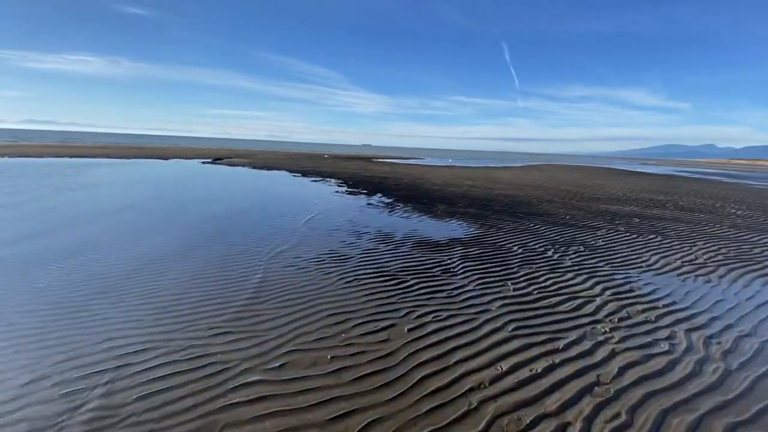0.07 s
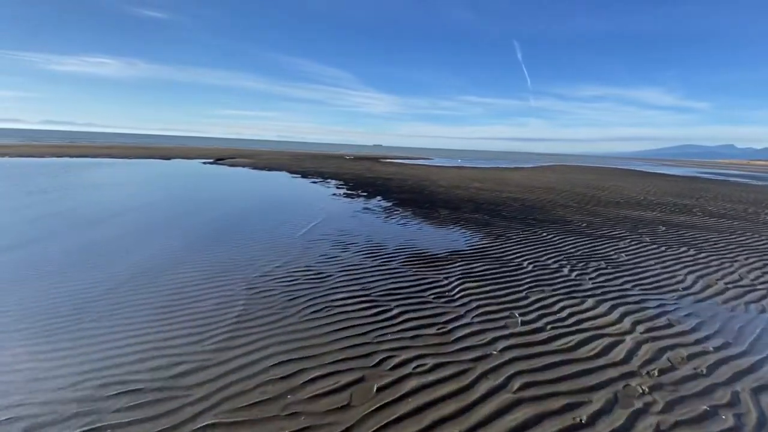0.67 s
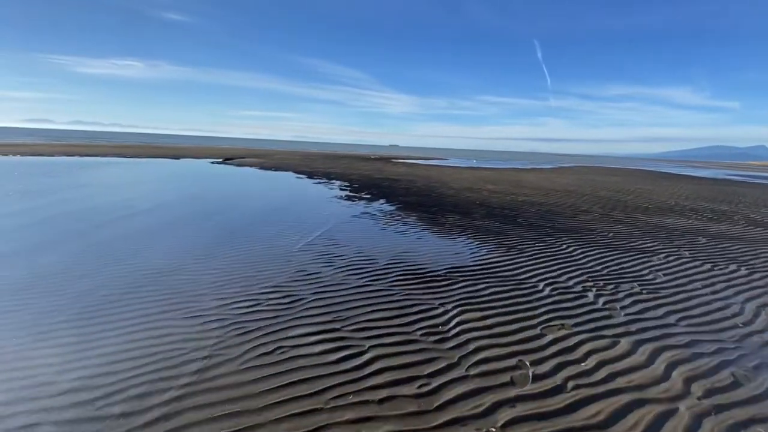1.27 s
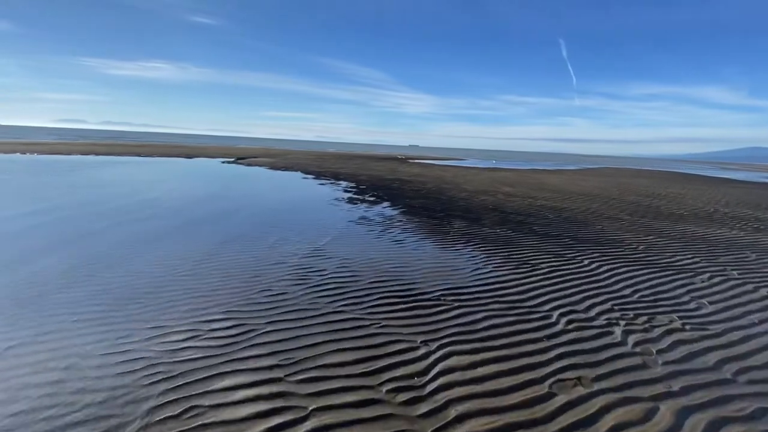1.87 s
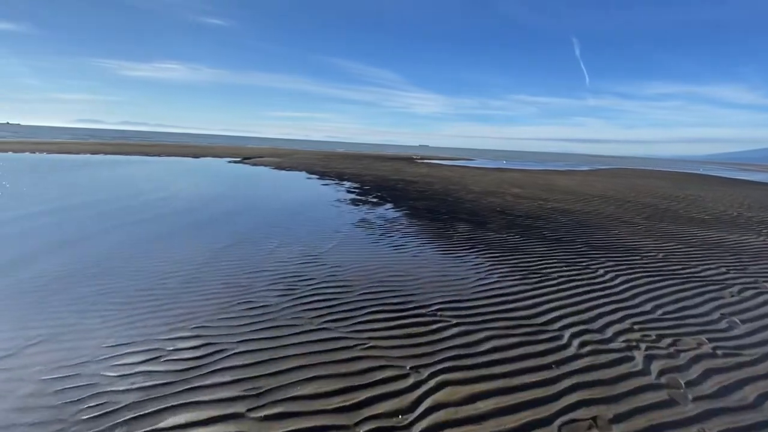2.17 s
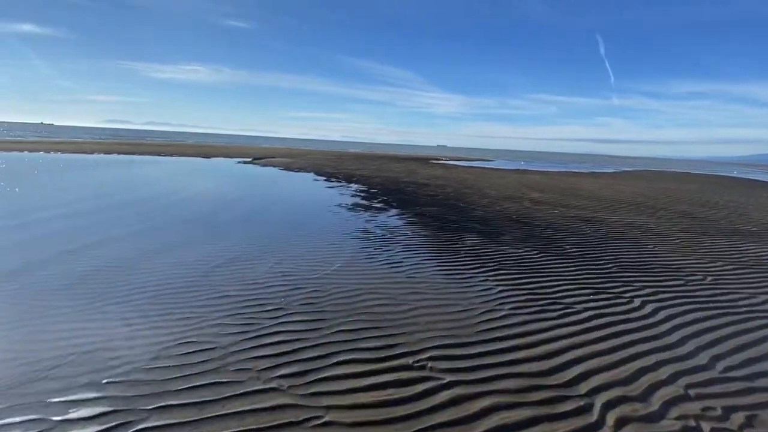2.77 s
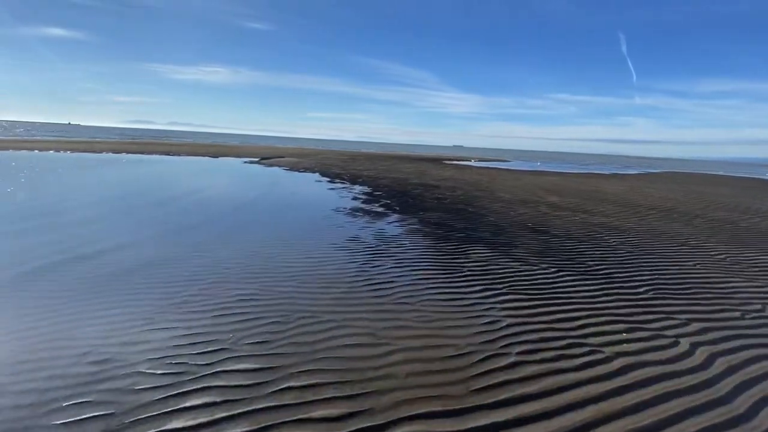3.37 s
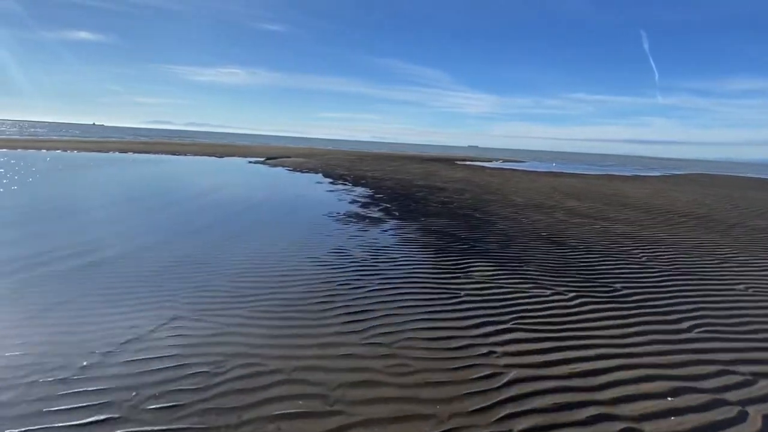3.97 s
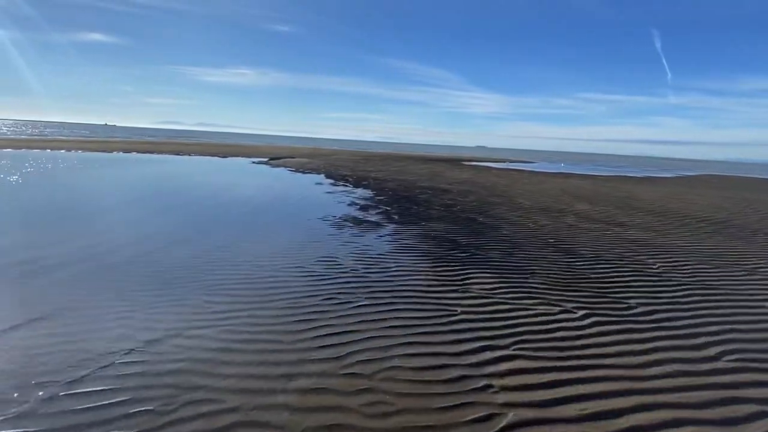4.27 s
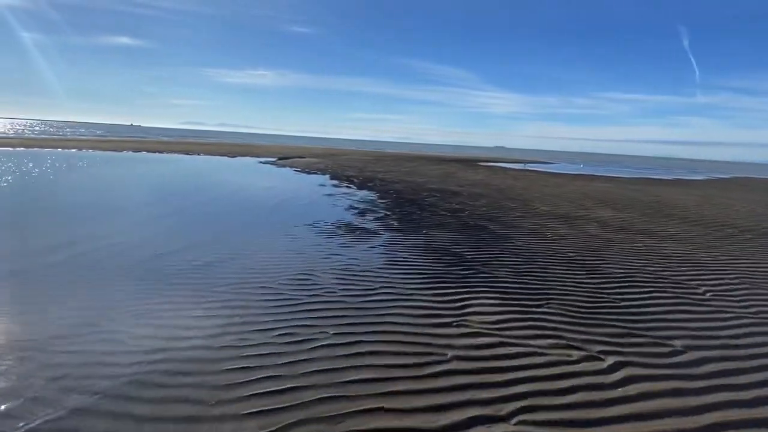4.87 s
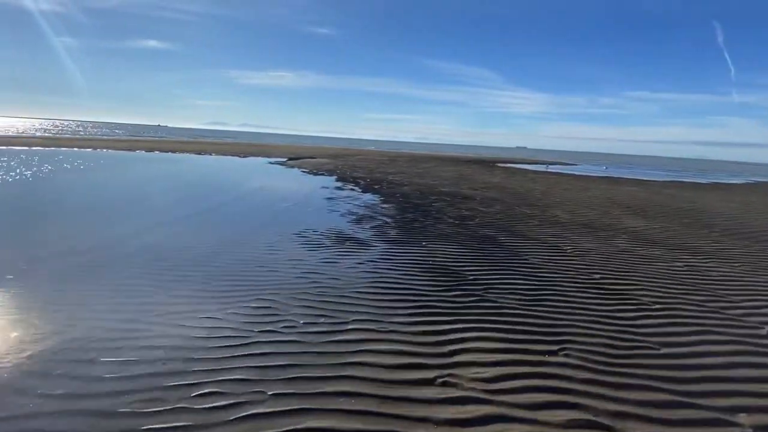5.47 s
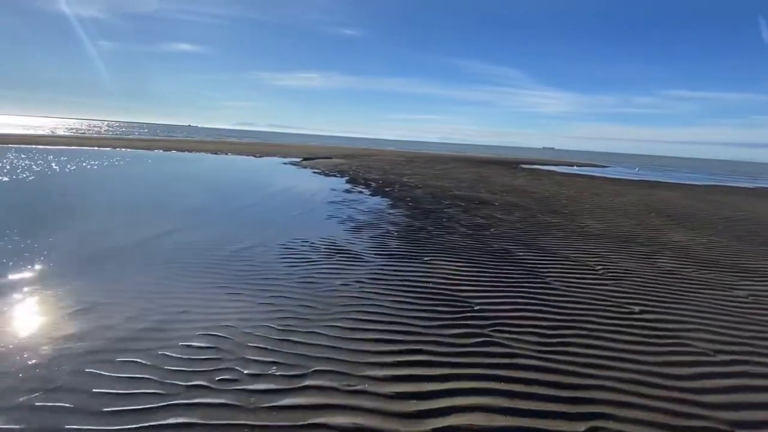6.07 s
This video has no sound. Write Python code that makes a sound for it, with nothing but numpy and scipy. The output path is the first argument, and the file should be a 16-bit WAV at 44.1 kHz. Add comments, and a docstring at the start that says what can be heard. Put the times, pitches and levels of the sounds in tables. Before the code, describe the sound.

Someone walks at an even pace over wet sand on an open beach. Each close step crunches and squelches, with a fizz of droplets and occasional sharp watery clicks and tiny bubbles, mostly early on. Clothing swishes with every stride. Wind picks up from a lull and buffets the handheld microphone in low gusts, while distant surf makes a soft, steady wash without any echo.

```python
"""Beside a tide pool, on wet, rippled sand: someone walks at an even pace, phone microphone in hand.
Close below, each sole crushes the sand, water sprays, clicks and bubbles under it, and clothing
swishes with every stride. Wind buffets the microphone itself, while far off the surf merges into
a steady wash. Open air, with no walls to echo."""
import sys
import numpy as np
from scipy import signal
from scipy.fft import rfft, irfft
from scipy.io import wavfile

SR = 44100
rng = np.random.default_rng(int(sys.argv[2]) if len(sys.argv) > 2 else 0)


def dump_mix(stems):
    """Bounce the given channels to the path in sys.argv[1] as a 16-bit WAV at rate SR."""
    frames = np.atleast_2d(stems).T  # one column per channel
    limited = np.clip(frames, -1, 1)  # hard clip at full scale
    pcm = np.round(limited * 32767).astype(np.int16)
    wavfile.write(sys.argv[1], SR, pcm)


N = 269892
TIME = np.arange(N) / SR

# footfalls: (heel down [s], contact [s], relative crunch level [dB], full weight after the heel [s],
#   boost at full weight [dB], heel spray level [dB], clothing swish level [dB],
#   hollow under the sole [Hz], hollow against crunch [dB],
#   squelch at the sole's rim [Hz], squelch against crunch [dB])
STEPS = [(.25, 0.14, -58.5, .123, 7, -63, -58.5, 1750, -5.5, 3600, -4.5),
         (0.88, 0.12, -58.5, 0.14, 1.5, -55, -70, 1810, 1.5, 4660, -2),
         (1.455, 0.16, -55, 0.086, 0.5, -60, -64, 1370, -4, 8000, -12.5),
         (2.098, .13, -58, 0.067, 4, -70, -64, 1480, -0.5, 3900, -8.5),
         (2.72, .12, -59, 0.014, -1.5, -56, -58.5, 1480, -2.5, 5470, 0),
         (3.336, .122, -58.5, 0.026, 4, -75, -61, 1530, 0, 5030, -4.5),
         (3.936, 0.13, -55, 0.085, 4.5, -59, -56.5, 1470, -5.5, 7550, -8.5),
         (4.527, 0.13, -58, 0.05, 5, -61, -61.5, 1760, -6, 4400, -3),
         (5.116, 0.16, -59, 0.12, 6, -62, -58, 1420, -6.5, 6860, -7.5),
         (5.695, 0.18, -60, 0.11, 5.5, -58, -60, 1400, -1, 5330, -8)]
# water flicked off a swinging shoe: (time [s], level [dB])
FLICKS = [(.449, -63.5), (.823, -66), (1.058, -60.5), (1.336, -66), (1.425, -57.5), (1.661, -56.5),
          (2.023, -64.5), (2.266, -57), (2.886, -58), (3.488, -57.5), (4.103, -57.5), (4.449, -50.5),
          (4.683, -55.5), (5.319, -62), (5.632, -54)]
# water films snapping: (time [s], level before the low cut [dB], pitch [Hz], ring t60 [s],
#   crack gain against the ring [dB])
SNAPS = [(0.2507, -37, 2090, 0.0046, -1), (.4263, -31.5, 2420, 0.0018, 7.5), (.870, -27, 2730, 0.0011, -3),
         (0.8932, -32, 3930, 0.0046, -3), (0.908, -34.5, 4150, 0.0088, -7),
         (0.9995, -42.5, 2720, 0.016, -13), (1.057, -40.5, 3300, 0.0045, -3), (1.087, -44, 4630, 0.012, 0),
         (1.347, -49, 5700, 0.0046, -10), (1.3912, -38.5, 5650, 0.0028, -16),
         (2.2585, -35, 7060, 0.0019, 3), (2.2665, -28.5, 3200, 0.0023, 2), (2.7275, -41, 4600, 0.017, -10),
         (4.452, -40.5, 5460, .006, -8), (4.6913, -44, 3680, 0.0055, -3), (4.7048, -39, 2980, 0.0036, 10.5)]
# air pockets ringing in the water: (time [s], level before the low cut [dB], start pitch [Hz], t60 [s])
BUBBLES = [(0.3645, -42, 1800, 0.018), (0.377, -46, 1660, 0.024), (.9165, -29, 1970, 0.01),
           (1.087, -35, 1650, 0.055), (2.731, -43.5, 1930, 0.015)]
# fabric hanging slack: (start [s], end [s], level change [dB])
SLACK = [(0.496, 0.775, -12.5), (5.364, 5.54, -9.5)]
# combs gliding up through the fabric's hiss: (start [s], end [s], lowest band from [Hz], to [Hz])
SWEEPS = [(0, .4, 6400, 9000), (1.0, 2.1, 5000, 9900), (2.38, 2.85, 5300, 9400), (3.1, 4.2, 2900, 8500),
          (4.8, 5.55, 1800, 5200), (5.45, 6.1, 2900, 5900)]
# gusts on the microphone: (time [s], rise [dB])
GUSTS = [(1.22, 4), (2.5, 5.5), (3.12, 8), (3.68, 8), (4.35, 3), (4.6, 6), (5.21, 2.5), (5.56, 9),
         (6.05, 4.5)]
# each source's tone at the microphone: (frequency [Hz], relative spectral density [dB])
SAND_SPECTRUM = [(500, 5.5), (1200, -6), (2800, -1), (4600, -1), (6500, -3.5), (8500, -8), (11000, -14),
                 (15500, -19.5)]
SPRAY_SPECTRUM = [(1000, 6.5), (3000, 2.5), (5200, 6.5), (7500, 2), (11000, -2.5), (15500, -11)]
CLOTH_SPECTRUM = [(700, 2), (1700, 2), (3200, 1), (5600, 0.5), (7200, -6), (9000, -11), (12000, -16.5),
                  (15500, -19)]
WIND_SPECTRUM = [(1, -19), (4, -1), (8, 1.5), (14, -15.5), (25, -17.5), (45, -24.5), (80, -29),
                 (150, -37.5), (250, -48), (500, -69), (1500, -90.5)]
SURF_SPECTRUM = [(100, 2.5), (300, 0.5), (600, -1.5), (950, -4), (1400, -9), (2200, -11.5), (3200, -17),
                 (4800, -19.5), (6800, -26), (9500, -36.5), (15500, -41)]


def footfalls(trim_db=-0.5):
    """Close below, wet grains slip and crunch under the weight, ringing the sole's hollow and wet rim."""
    grit = colour(grains(per_s=16000, spread_db=3.5), SAND_SPECTRUM) * undb(3.06 * wander(110))
    crunch = .82 * grit + .55 * froth()
    slips = grains(per_s=5000, spread_db=3.5)
    out = np.zeros(N)
    for heel, contact, db, weight_s, weight_db, _, _, hollow_hz, hollow_db, rim_hz, rim_db in STEPS:
        pressure = burst(heel, attack_s=.0079, hold_s=contact, t60_s=.15)  # lands, stays, peels away
        load = pressure * undb(db + weight_db * bump(heel + weight_s, width_s=.028))
        hollow = unit(resonate(resonate(slips, hollow_hz, 600), hollow_hz, 1500))
        squelch = unit(resonate(resonate(slips, rim_hz, 900), rim_hz, 2400))
        out += load * (crunch + undb(hollow_db) * hollow + undb(rim_db) * squelch)
    return undb(trim_db) * out


def froth(count=9000, q=14, spread_db=2.5):
    """Tiny bubbles of every size burst between the wet grains, each ringing for a few cycles."""
    out, t = np.zeros(N), TIME[:512]
    for when, pitch, size in rng.random((count, 3)):
        hz = 1100 * 10 ** pitch
        ring = np.sin(2 * np.pi * hz * t) * np.exp(-np.pi * hz * t / q)
        strength = hz * undb(-spread_db * np.log(size + .03))  # small bubbles burst more sharply
        add(out, when * TIME[-1], strength * ring)
    return colour(out, SAND_SPECTRUM)


def sprays():
    """A bright fizz of droplets at ground level, squeezed out by each heel and flicked off the shoe."""
    fizz = colour(grains(per_s=6900, spread_db=2.0), SPRAY_SPECTRUM)
    squeezed = sum(undb(spray_db) * burst(heel, attack_s=.0055, hold_s=.024, t60_s=.16)
                   for heel, _, _, _, _, spray_db, *_ in STEPS)
    flicked = sum(undb(db) * burst(s, attack_s=.006, hold_s=.013, t60_s=.06) for s, db in FLICKS)
    return (squeezed + flicked) * fizz


def snaps(overtone_ratio=1.35, overtone_db=-5):
    """Water films break underfoot: a sharp crack and a brief ring, too small to radiate bass."""
    out, t = np.zeros(N), TIME[:2048]
    for s, db, hz, t60, crack_db in SNAPS:
        phase = 2 * np.pi * hz * t
        modes = np.sin(phase) + undb(overtone_db) * np.sin(overtone_ratio * phase)
        ring = modes * undb(-60 * t / t60)
        crack = .3 * rng.standard_normal(len(t)) * np.exp(-t / .0006)
        crack[3] = 1.4  # the spike of the break
        low_cut = signal.butter(6, .72 * hz, "high", fs=SR, output="sos")
        add(out, s, undb(db) * signal.sosfilt(low_cut, ring + undb(crack_db) * crack))
    return out


def bubbles(glide=2.3):
    """By the feet, each bubble rings and rises in pitch as it nears the surface."""
    out, t = np.zeros(N), TIME[:4096]
    for s, db, hz, t60 in BUBBLES:
        phase = 2 * np.pi * hz * t * (1 + glide * t)
        add(out, s, undb(db - 60 * t / t60) * np.sin(phase))
    return signal.sosfilt(signal.butter(3, 1200, "high", fs=SR, output="sos"), out)


def clothing(band_gap_hz=1850):
    """Fabric hisses near the microphone with each stride; bands glide up through it like phasing."""
    hiss = noise()
    for start, end, start_hz, end_hz in SWEEPS:
        lowest_hz = np.interp(TIME, [start, end], [start_hz, end_hz])
        comb = sum(gain * gliding_band(lowest_hz + k * band_gap_hz, width_hz=800)
                   for k, gain in enumerate([.38, .2, .45, .28]))
        hiss += gate(start, end, rise_s=.054, fall_s=.088) * comb
    return colour(hiss, CLOTH_SPECTRUM) * rubbing() * undb(1.1 * wander(25))


def rubbing(steady_db=-66, rise_db_per_s=36.5, fall_db_per_s=58):
    """How hard the fabric rubs: a swish for each leg swing over a steady rub, dropping when slack."""
    power = undb(steady_db) ** 2
    for heel, _, _, _, _, _, swish_db, *_ in STEPS:
        since_peak = TIME - heel - .052  # the swish peaks just after the heel lands
        slope_db = np.minimum(rise_db_per_s * since_peak, -fall_db_per_s * since_peak)
        power += undb(swish_db + slope_db) ** 2
    slack_db = sum(db * gate(start, end, rise_s=.076, fall_s=.1) for start, end, db in SLACK)
    return np.sqrt(power) * undb(slack_db)


def wind(heave_db=-27, rumble_db=-27.5, split_hz=49.3):
    """Eddies press right on the microphone: a low heave surging in the gusts, a steadier rumble above."""
    eddies = colour(noise(), WIND_SPECTRUM)
    heave = signal.sosfiltfilt(signal.butter(2, split_hz, fs=SR, output="sos"), eddies)
    rumble = eddies - heave
    lull_db = -5 * np.maximum(1 - TIME / .7, 0)  # the breeze picks up out of a lull
    gust_db = sum(db * bump(s, width_s=.087) for s, db in GUSTS)
    return undb(heave_db + lull_db + gust_db) * heave + undb(rumble_db + lull_db / 2) * rumble


def surf(body_db=-56, hiss_db=-55, swell_period_s=3.43, crest_s=3.4):
    """Far breakers merge into a slowly swelling wash; the fine hiss above it stays even."""
    wash = colour(noise(), SURF_SPECTRUM)
    body = signal.sosfilt(signal.butter(1, 1100, fs=SR, output="sos"), wash)
    swell_db = 1.3 * np.cos(2 * np.pi * (TIME - crest_s) / swell_period_s)
    return undb(hiss_db) * (wash - body) + undb(body_db + swell_db + .87 * wander(15)) * body


def seepage(level_db=-81):
    """Faint lone ticks of water draining through the sand."""
    return undb(level_db) * colour(grains(per_s=50, spread_db=3), SPRAY_SPECTRUM)


def undb(db):
    """Decibels to gain."""
    return 10 ** (np.asarray(db) / 20)


def unit(x):
    """Scale to rms 1."""
    return x / np.sqrt(np.mean(x ** 2))


def noise():
    """White noise for the whole length."""
    return rng.standard_normal(N)


def colour(x, spectrum):
    """Filter x by a curve of (frequency [Hz], level [dB]) points, then scale to rms 1."""
    hz, db = np.transpose(spectrum)
    bin_hz = np.maximum(np.arange(N // 2 + 1) * SR / N, .5)
    gain = undb(np.interp(np.log(bin_hz), np.log(hz), db))
    return unit(irfft(rfft(x) * gain, N))


def resonate(x, hz, width_hz):
    """A two-pole resonance."""
    return signal.lfilter(*signal.iirpeak(hz, hz / width_hz, fs=SR), x)


def wander(per_s):
    """Random drift with a spread near 1."""
    knots = rng.standard_normal(2048)
    return 1.2 * np.interp(TIME * per_s, np.arange(len(knots)), knots)


def grains(per_s, spread_db):
    """Random ticks of unequal size."""
    ticks = (rng.random(N) < per_s / SR) * np.sign(noise())
    return ticks * undb(spread_db * np.minimum(rng.exponential(size=N), 4))


def gliding_band(hz, width_hz):
    """A band of noise around a moving centre, wavering in pitch and strength."""
    envelope = signal.sosfilt(signal.butter(2, width_hz / 2, fs=SR, output="sos"), noise())
    centre_hz = hz * (1 + .025 * wander(14))
    carrier = np.cos(2 * np.pi * np.cumsum(centre_hz) / SR)
    return unit(envelope * undb(1.5 * wander(14))) * carrier


def gate(start, end, rise_s, fall_s):
    """1 between two times, with sloping edges outside them."""
    return np.clip((TIME - start) / rise_s + 1, 0, 1) * np.clip((end - TIME) / fall_s + 1, 0, 1)


def burst(start, attack_s, hold_s, t60_s):
    """Envelope: reach full strength at start, hold, die away."""
    rise = np.clip((TIME - start) / attack_s + 1, 0, 1)
    return rise * undb(-60 * np.maximum(TIME - start - hold_s, 0) / t60_s)


def bump(centre, width_s):
    """A smooth bell of height 1 around a moment."""
    return np.exp(-((TIME - centre) / width_s) ** 2)


def add(out, s, sound):
    """Mix a short sound in at time s."""
    i = int(s * SR)
    out[i:i + len(sound)] += sound[:N - i]


def scene():
    """In mono: feet and clothing close by, wind on the microphone, sea far off."""
    close = footfalls() + sprays() + snaps() + bubbles() + clothing() + seepage()
    return (close + surf() + wind())[None]


def record(dry, port_hz=13750, top_hz=15850):
    """The sound eases in and out over its first and last moments; the handheld phone's microphone port lifts
    the high treble; the top is cut."""
    fade = np.sin(np.pi / 2 * gate(.01, TIME[-1] - .01, rise_s=.01, fall_s=.01)) ** 2
    eased = dry * fade
    heard = eased + .39 * resonate(eased, port_hz, width_hz=900)
    return signal.sosfilt(signal.ellip(10, .2, 80, top_hz, fs=SR, output="sos"), heard)


dry = scene()
out = record(dry)
dump_mix(out)
```